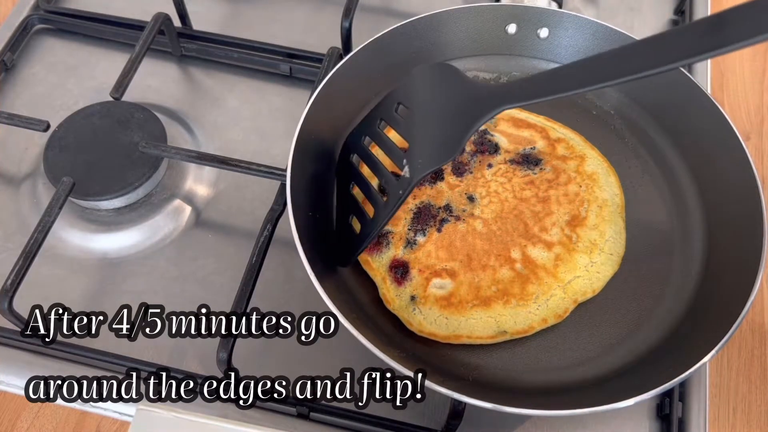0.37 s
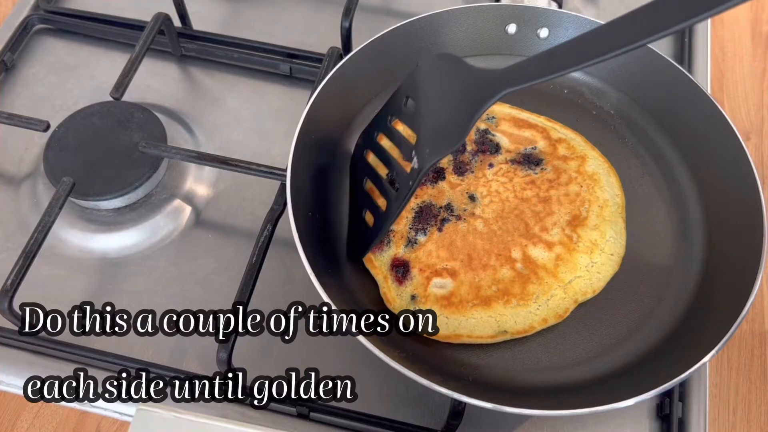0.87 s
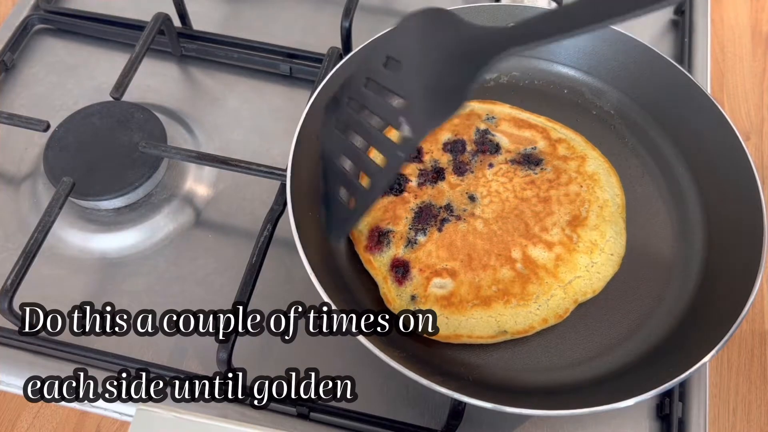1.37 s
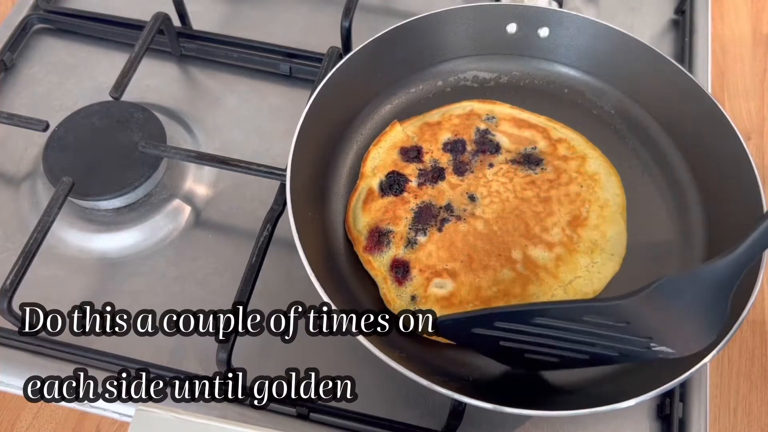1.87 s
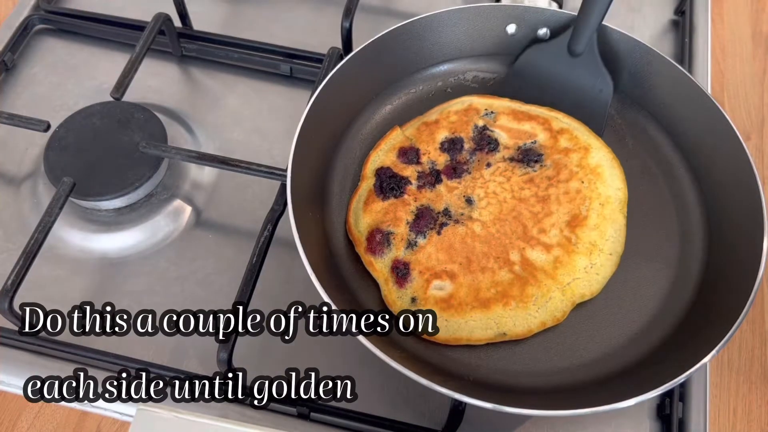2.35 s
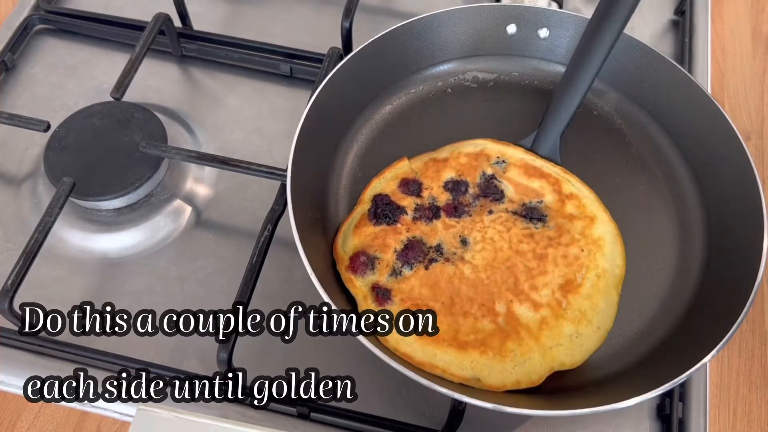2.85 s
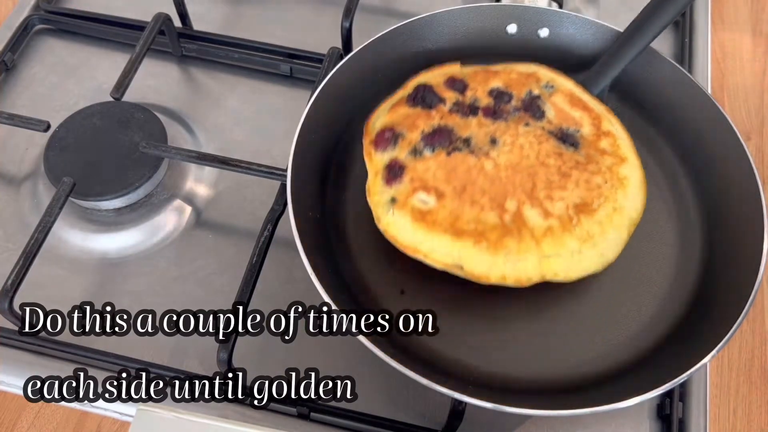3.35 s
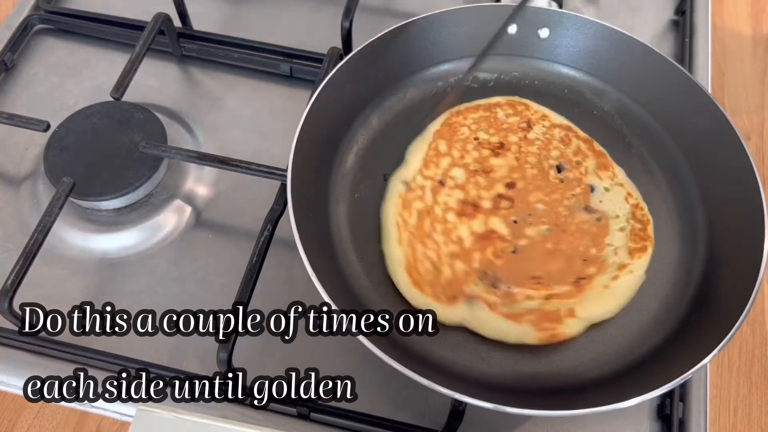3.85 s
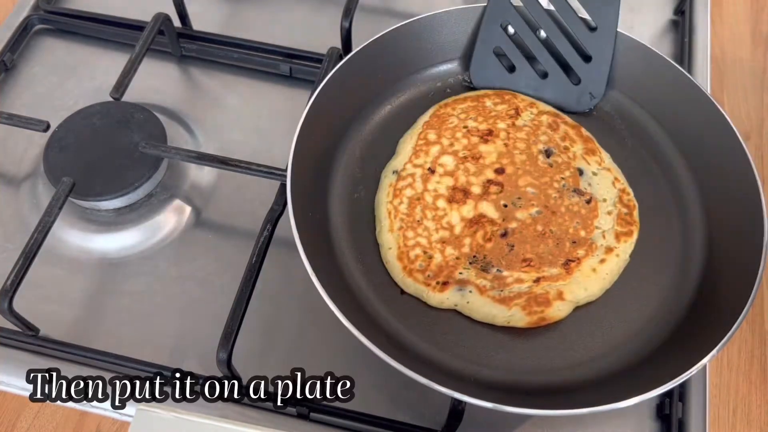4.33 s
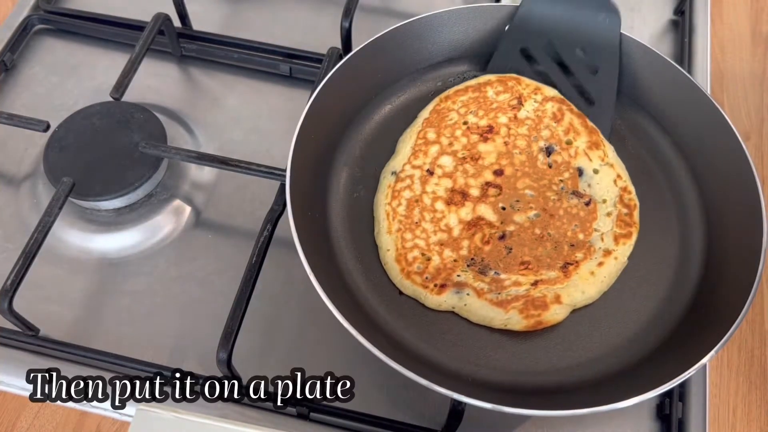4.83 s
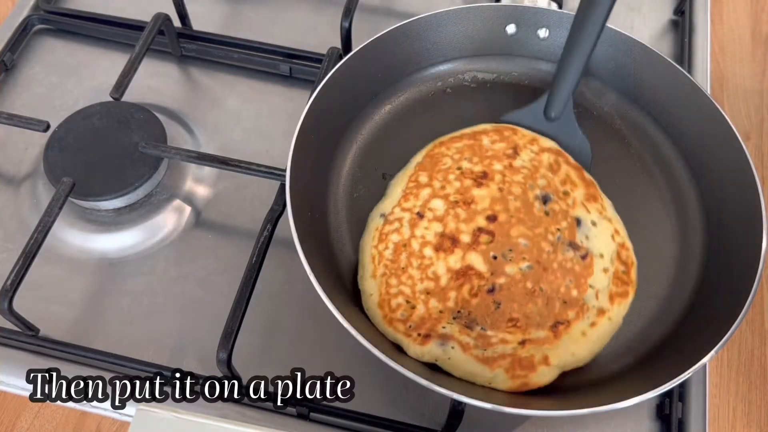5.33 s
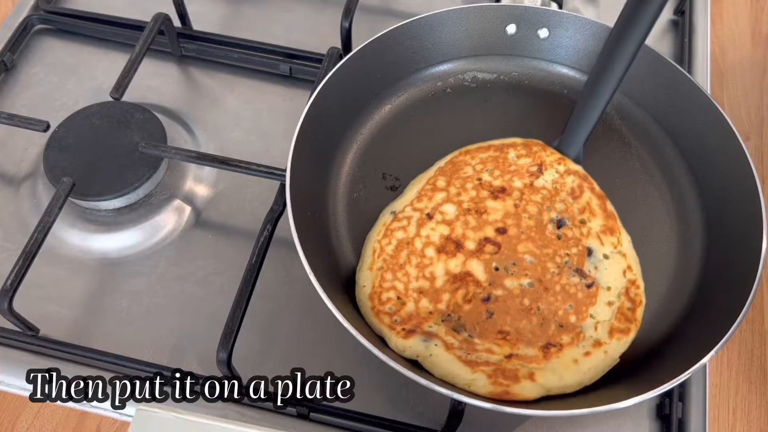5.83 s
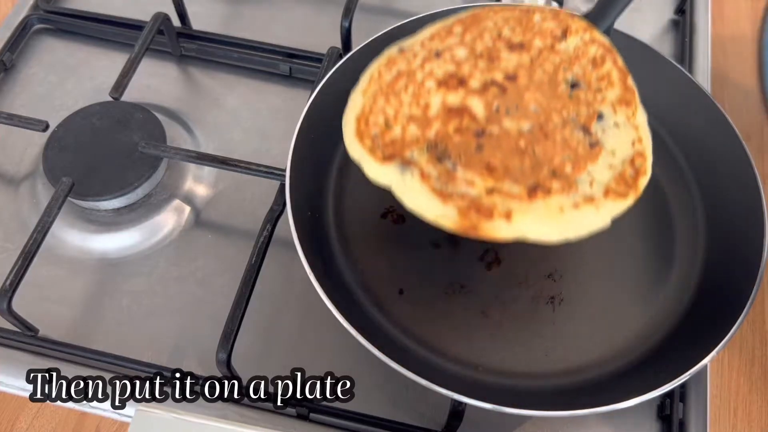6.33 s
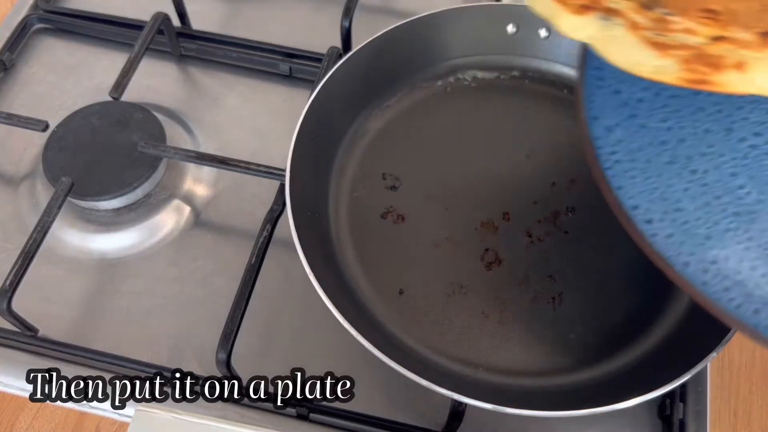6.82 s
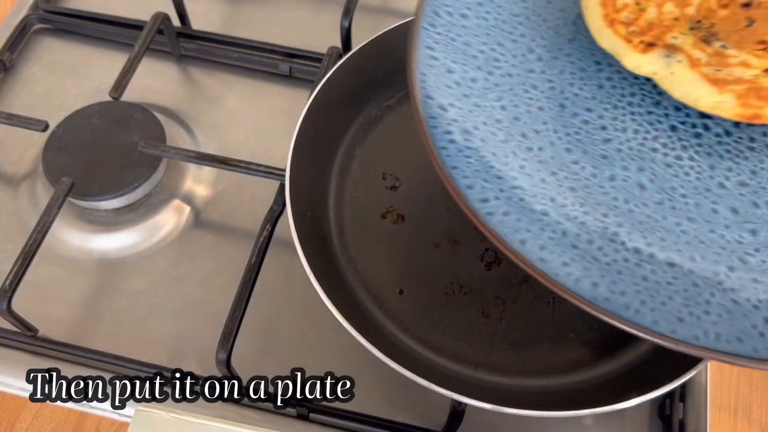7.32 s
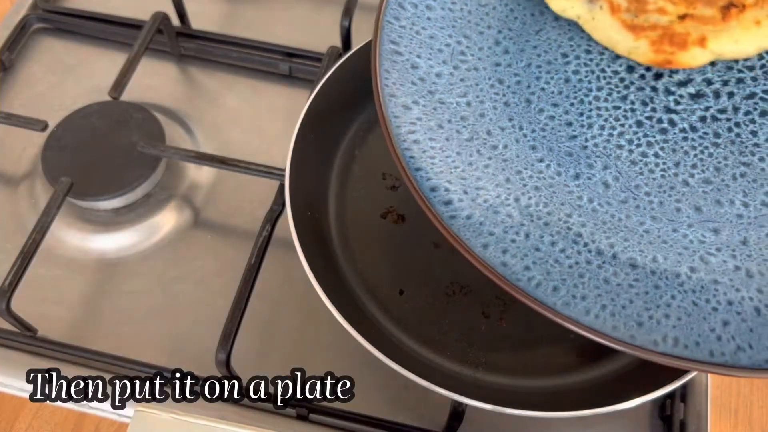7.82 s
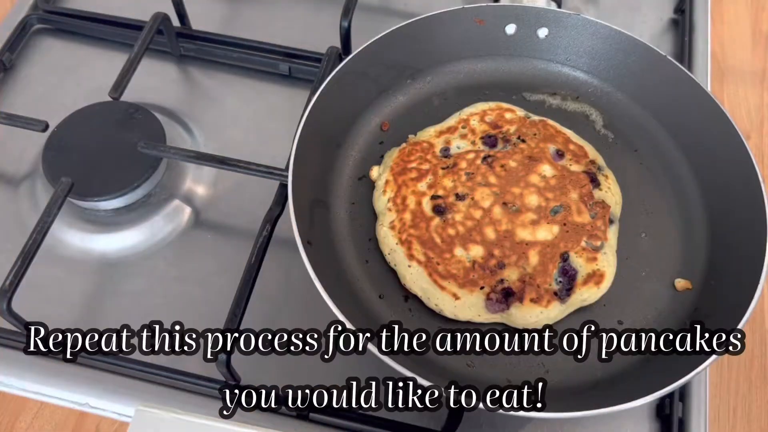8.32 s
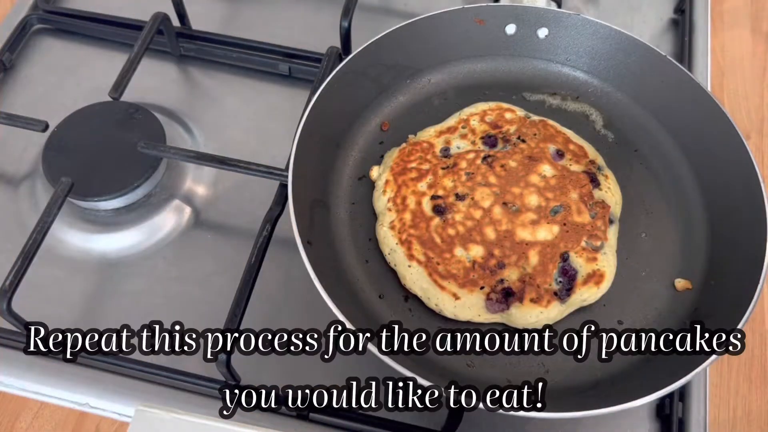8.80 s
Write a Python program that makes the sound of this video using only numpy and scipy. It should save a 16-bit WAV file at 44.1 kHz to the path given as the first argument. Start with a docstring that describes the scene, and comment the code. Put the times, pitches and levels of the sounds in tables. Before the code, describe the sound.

Close to a pan on a gas stove, a plastic spatula knocks and rubs lightly over faint frying while a small motor buzzes twice nearby. Scrapes slide under a pancake; it flips and lands with a loud slap and soft thud. Fat sizzles and spits brightly for a second or two, then dies away. Near silence follows, ending with sparse tiny crackles in a small kitchen.

```python
"""A nonstick pan close to the microphone: a plastic spatula loosens, flips and lifts a pancake on a gas stove.
Knocks and rubs ring the pan's damped modes; fat sizzles, steams and spits as clicks, noise and short rings.
A small vibrating motor spins up twice nearby, a gliding sine that rings the counter under it.
Flame, room tone, low rumble, thin tones and a short kitchen echo lie around them.
There are four stretches; the level dips briefly between them."""
import sys
import numpy as np
from scipy import signal
from scipy.io import wavfile
from scipy.ndimage import uniform_filter1d

SR = 44100
rng = np.random.default_rng(int(sys.argv[2]) if len(sys.argv) > 2 else 0)


def voltage_ratio(decibels):
    """Convert decibels (scalar or array-like) to amplitude ratios, 20 dB per decade."""
    exponent = np.asarray(decibels, float) / 20
    return 10 ** exponent


def dump(signal):
    """Clip the signal to [-1, 1] and save it as 16-bit WAV at the path in sys.argv[1]."""
    limited = np.clip(np.atleast_2d(signal).T, -1, 1)
    pcm = np.round(limited * 32767).astype(np.int16)
    wavfile.write(sys.argv[1], SR, pcm)


N = 404826


def rms_one(x):
    """Scales to rms 1."""
    return x / np.sqrt(np.mean(x ** 2) + 1e-20)


def evened(x):
    """Holds the level near 1 over a fifth of a second."""
    return x / np.sqrt(uniform_filter1d(x ** 2, size=8820) + 1e-20)


def to_db(power):
    """Power to dB."""
    return 10 * np.log10(power + 1e-20)


def band(x, low_hz, high_hz):
    """Keeps what lies between two frequencies."""
    return signal.sosfilt(signal.butter(2, [low_hz, high_hz], "band", fs=SR, output="sos"), x)


def in_time(rows):
    """Columns of a table, one value a sample."""
    s, *columns = np.transpose(rows)
    return [np.interp(np.arange(N) / SR, s, column) for column in columns]


def at_hz(points, hz):
    """Reads a spectrum on a log frequency axis."""
    point_hz, value = np.transpose(points)
    return np.interp(np.log(hz), np.log(point_hz), value)


def drift(rate_hz):
    """Slow chance of spread 1, drawn every 40 samples."""
    r = np.exp(-80 * np.pi * rate_hz / SR)
    noise = rng.standard_normal(N // 40 + 2002)
    slow = signal.lfilter([1], [1, -2 * r, r * r], noise)[2000:]
    return np.interp(np.arange(N) / 40, np.arange(len(slow)), rms_one(slow))


def ring(force, hz, t60):
    """A unit click sets a sine of height 1 ringing, 60 dB down after t60 seconds."""
    r, w = voltage_ratio(-60 / (t60 * SR)), 2 * np.pi * hz / SR
    return signal.lfilter([0, np.sin(w)], [1, -2 * r * np.cos(w), r * r], force + 1e-18)


def glide(rows, rough_db):
    """A sine along a pitch and rms level curve, silent outside it."""
    hz, db = in_time(rows)
    sample = np.arange(N)
    on = (sample > rows[0][0] * SR) & (sample < rows[-1][0] * SR)
    sine = np.sin(2 * np.pi * np.cumsum(hz) / SR)
    return np.sqrt(2) * voltage_ratio(db + rough_db * drift(90)) * on * sine


def grains(per_s, spread_db, hiss):
    """Random clicks of uneven size on a share of smooth noise, for mid and side."""
    sizes = voltage_ratio(spread_db * np.minimum(rng.exponential(1, N), 5)) * rng.choice([-1, 1], N)
    born = rng.random(N) < per_s * voltage_ratio(3 * drift(8)) / SR
    mid = rms_one(sizes * born) + hiss * rng.standard_normal(N)
    return np.array([mid, rng.standard_normal(N)])


# How alike the two microphone channels hear the noises around them.
# Each row: frequency in Hz, left-right likeness from -1 to 1.
EAR_LIKENESS = [(70, .999), (180, 0.79), (550, 0.26), (1650, 0.89), (5000, 0.99)]


def coloured(source, spectrum, patchy_db):
    """Twelve-band bank: each band has its level, flicker and left-right likeness; rms 1."""
    out, together = 0, 0.21 * drift(27.0)
    edges = np.geomspace(spectrum[0][0], spectrum[-1][0], 13)
    source = source / np.std(source, axis=1, keepdims=True)
    for k, (low, high) in enumerate(zip(edges, edges[1:])):
        mid, side = band(source, low, high)
        hz = np.sqrt(low * high)
        alike = np.clip(at_hz(EAR_LIKENESS, hz), -1, 1)
        flicker_db = patchy_db * (together + 0.94 * drift(14))
        gain = voltage_ratio(at_hz(spectrum, hz) + flicker_db) * (-1) ** k
        out = out + gain * (np.sqrt(1 + alike) * mid + np.sqrt(1 - alike) * side * [[1], [-1]])
    return rms_one(out)


# The stretches at the stove. Each row: start in seconds, free ring of the pan under the murmur from 0 to 1,
# small spits over the sizzle in relative dB, low rumble in relative dB, room tone in dB.
STRETCH_ROWS = [(0, 0.6, -21, -63.5, -72.5), (1.986, 0.69, 17.5, -69.5, -70),
                (4.257, 0.41, 14, -68.5, -70.5), (8.018, 0.14, 18.5, -75, -66.5)]


def stretch_at(s):
    """Which stretch a moment lies in."""
    return np.clip(np.searchsorted(np.transpose(STRETCH_ROWS)[0], s) - 1, 0, None)


def by_stretch():
    """Columns of the stretch table, each held until the next stretch starts."""
    return np.transpose(STRETCH_ROWS)[1:, stretch_at(np.arange(N) / SR)]


def favour(hz, centre_hz, octaves):
    """The contact point favours the modes near one pitch."""
    return np.exp(-.5 * (np.log2(hz / centre_hz) / octaves) ** 2)


# The pan, close by, rings differently as its load and seating change: one table of modes a seating.
# Each row: frequency in Hz, struck level in relative dB, t60 in seconds, rubbed level in relative dB.
PAN_MODES = [
    [(553, -2, 0.065, 20), (823, 0, 0.49, 6), (1000, 7.5, 0.014, -38), (1177, -2.5, 0.17, -37),
     (1400, -1, 0.044, 5), (1587, -4, 0.11, 7), (1795, 0, 0.1, -3), (2267, -1.5, 0.13, -2.5),
     (2863, 0.5, 0.12, -21), (3340, -0.5, 0.047, -10)],
    [(438, -13.5, 0.11, 6.5), (743, 4, 0.079, -0.5), (1162, 7, 0.028, -2.5), (1230.4, -3.5, 0.22, 0.5),
     (1899, -6, 0.24, -15), (1954, 0, .25, -2.5), (2074, -12.5, 0.078, -7), (2370, -4.5, 0.13, -8.5),
     (2505, -6.5, 0.14, -5), (2924, 6, 0.055, -12), (3204, 7.5, 0.093, -14.5), (3740, -3.5, .07, -1.5),
     (4306, 0.5, 0.037, -13), (8300, 7.5, 0.072, -32)],
    [(590, 2, 0.043, -16), (816, -1.5, 0.071, 6.5), (1313, 1, 0.11, -1.5), (1672, -9, 0.083, -1),
     (1933, -7, 0.035, -20), (2190, -11, 0.13, -7), (2895, -4.5, 0.067, -4.5), (3240, -5, 0.1, -5)],
]
# Each entry: the seating, as an index into the pan tables, of one stretch.
STRETCH_SEATING = [0, 1, 2, 2]


def rub(level_db, centre_hz, free):
    """The sliding edge stutters into wandering pan modes over a rustle; the grate trembles along."""
    force = grains(per_s=540.0, spread_db=4.0, hiss=1.8)[0]
    seating = np.array(STRETCH_SEATING)[stretch_at(np.arange(N) / SR)]
    tones = 0
    for seat, modes in enumerate(PAN_MODES):
        seat_force = force * (seating == seat)
        for k, (hz, _, t60, rub_db) in enumerate(modes):
            wander = (-1) ** k * voltage_ratio(rub_db + 5.3 * drift(6.54))
            near = favour(hz, centre_hz, octaves=0.76)
            tones = tones + wander * near * ring(seat_force, hz, t60) * np.sqrt(.1 / t60)
    rustle = 0
    for k, hz in enumerate(np.geomspace(480., 4400., num=14)):
        near = favour(hz, centre_hz, octaves=0.44) + 0.055
        rustle = rustle + (-1) ** k * near * ring(force, hz, 12.0 / hz)
    both = np.sqrt(free) * evened(tones) + np.sqrt(1 - free) * evened(rustle)
    tremble = rms_one(band(force, 120., 420.))
    return voltage_ratio(level_db + 1.0 * drift(30.0)) * (both + voltage_ratio(-12.5) * tremble)


# Frying in the pan, before the strokes add to it.
# Each row: time in seconds, sizzle in dB, steam in dB, murmur of the fat in relative dB.
FRYING_LEVELS = [(0, -60.5, -64, -68.5), (1.7, -60, -66, -73.5), (1.97, -60, -75, -85),
                 (2.0, -71, -78, -82), (2.75, -87.5, -76, -81), (3.74, -100, -81, -68.5),
                 (3.78, -49.5, -48, -35), (3.95, -48, -43, -50.5), (4.23, -46, -46.5, -55.5),
                 (4.28, -63.5, -60, -57), (4.55, -56, -52.5, -53), (4.85, -46.5, -54.5, -47),
                 (5.15, -40, -44.5, -54.5), (5.28, -46, -47.5, -53.5), (5.35, -58, -70, -53.5),
                 (5.5, -50, -66, -57), (5.64, -54, -58.5, -61), (5.76, -65.5, -68, -68),
                 (6.2, -71, -75.5, -74), (7.12, -75.5, -86, -86), (7.99, -88, -83.5, -77),
                 (8.04, -70, -67.5, -72), (8.5, -67, -66.5, -68.5), (9.18, -67.5, -68, -71.5)]


def frying():
    """Sizzle, steam and murmur levels in dB, gliding from row to row."""
    return in_time(FRYING_LEVELS)


# Colour of the steam over the pan. Each row: frequency in Hz, density in relative dB per Hz.
STEAM_COLOUR = [(1200, -31), (2200, -7), (4000, -8), (7000, -12.5), (9500, -14.5), (15500, -26)]


def steam(level_db):
    """Steam and the hiss of the strokes: dense clicks on noise, its bands flickering."""
    return voltage_ratio(level_db) * coloured(grains(per_s=1500.0, spread_db=4.5, hiss=1.9), STEAM_COLOUR, patchy_db=2.5)


# Colour of the fat frying close by. Each row: frequency in Hz, density in relative dB per Hz.
SIZZLE_COLOUR = [(3530, -36), (6000, -10.5), (9180, -17), (10000, -10), (11900, -1), (16200, -10.5)]


def sizzle(level_db):
    """Frying fat: dense clicks over a little noise, high in pitch."""
    source = grains(per_s=2000.0, spread_db=2.0, hiss=0.4)
    return voltage_ratio(level_db) * coloured(source, SIZZLE_COLOUR, patchy_db=0.0)


# Flame and room tone, all around. Each row: frequency in Hz, density in relative dB per Hz.
ROOM_COLOUR = [(59, -26.5), (100, 0), (275, -15), (908, -7), (1700, -11), (1850, -32), (1960, -33.5),
               (3000, -16), (3900, -54), (6600, -120)]


def room_tone(level_db):
    """Flame and room as noise whose bands flicker."""
    return voltage_ratio(level_db) * coloured(rng.standard_normal((2, N)), ROOM_COLOUR, patchy_db=5.0)


def rumble(level_db):
    """Low room noise gathered around one room mode, alike at both ears."""
    noise = rng.standard_normal(N)
    broad = band(noise, 25., 130.)
    return voltage_ratio(level_db + 1.4 * drift(5)) * (rms_one(ring(noise, 74.0, 0.17)) + 0.97 * rms_one(broad))


# Thin steady tones behind the rest. Each row: frequency in Hz, level in dB.
THIN_TONES = [(1970, -85), (3300, -95)]


def whine():
    """Thin sines at steady pitch, their level slightly rough."""
    return sum(glide([(0, hz, db), (N / SR, hz, db)], rough_db=0.88) for hz, db in THIN_TONES)


# Larger drops of fat spitting close by.
# Each row: time in seconds, click height in dB, body below 6 kHz in dB relative to that click.
LARGE_POPS = [(0.9632, -30.5, -14), (2.635, -38, -5), (3.665, -42.5, 11), (4.087, -17.5, -20),
              (4.4976, -23, -6), (4.5679, -24.5, -17), (4.5954, -24, -2.5), (4.8391, -18, -4),
              (4.8895, -18, -12), (4.95, -22.5, -2), (5.2123, -18.5, -12), (5.909, -33, -19),
              (6.1663, -36, -18), (6.2264, -42.5, -3.5), (6.263, -41.5, -4), (6.619, -43.5, -6),
              (6.7015, -40.5, 1.5), (6.708, -46.5, 2.5), (7.3707, -48, -5), (8.135, -51, 11.5),
              (8.322, -40, -18), (8.651, -37, -4), (8.697, -40, 3), (8.751, -44.5, 6), (8.938, -40.5, 1.5),
              (9.082, -38.5, 0)]


def pops(sizzle_db, spit_db):
    """Bursting droplets: close ticks, bright or with body below; small ones clump, at pitches drawn by chance."""
    size_db = spit_db + 3 * np.minimum(rng.exponential(1, N), 3)
    born = rng.random(N) < 160 * voltage_ratio(6 * drift(8)) / SR
    tick = voltage_ratio(sizzle_db + size_db) * born * rng.choice([-1, 1], N)
    body = tick * rng.uniform(0, 0.84, N) ** 2
    tick = tick * rng.random(N)
    dealt = rng.integers(0, 7, N)   # which of seven pitches a droplet takes
    tick_hz = np.geomspace(9000., 14000., num=7)
    small = sum(ring(tick * (dealt == k), hz, 6.6 / hz) for k, hz in enumerate(tick_hz))

    s, peak_db, body_db = np.transpose(LARGE_POPS)
    at = (s * SR).astype(int)
    sign = rng.choice([-1, 1], len(LARGE_POPS))
    big = np.zeros(N)
    big[at] = sign * voltage_ratio(peak_db)
    body[at] = sign * voltage_ratio(peak_db + body_db)
    dealt[at] = 4   # the large ones all take the same pitch
    # further ticks follow within a few milliseconds
    big = big + sum(np.roll(big * rng.normal(0, 0.3, N), lag) for lag in (37, 89, 151))
    bright = 0.83 * ring(big, 12000., 0.0021) - 0.4 * ring(big, 7000.0, 0.0019)
    body_hz = np.geomspace(1100., 6000., num=7)
    sung = sum(ring(body * (dealt == k), hz, 7.3 / hz) for k, hz in enumerate(body_hz))
    burst = bright + 1.32 * small + .8 * ring(body, 4700.0, 0.00074) + 0.39 * sung
    return burst * voltage_ratio(0.68 * drift(40) * [[1], [-1]])


# The motor nearby. Each entry: start in seconds.
MOTOR_START_S = [0.0388, 0.528]
# The surface under the motor. Each row: frequency in Hz, level in relative dB, t60 in seconds.
COUNTER_MODES = [(112.5, -2, 0.9), (129.5, 10.5, 0.33), (159.2, 2.5, 0.81), (189.5, 1.5, 0.73)]
DRIVEN_S, SPIN_UP_S = 0.21, 0.076
SLOW_HZ, FAST_HZ, COAST_HZ_PER_S = 61, 199.3, 766
FULL_S, STOP_S = 0.042, 0.31   # after each start: full level reached, fall begun
RISE_DB_PER_S, FALL_DB_PER_S = 598, 698


def motor():
    """An off-centre weight shakes once a turn; counter modes beat with it and ring on under a faint buzz."""
    t = np.linspace(0, .38, num=60)
    driven = np.minimum(t, DRIVEN_S)
    hz = FAST_HZ - (FAST_HZ - SLOW_HZ) * np.exp(-driven / SPIN_UP_S)
    hz = hz - COAST_HZ_PER_S * (t - driven)
    slope_db = np.minimum(RISE_DB_PER_S * (t - FULL_S), FALL_DB_PER_S * (STOP_S - t))
    db = -31.5 + np.minimum(0, slope_db)   # midway between the two ears
    shake = sum(glide(np.transpose([s + t, hz, db]), rough_db=0) for s in MOTOR_START_S)
    buzz = band(shake * rng.standard_normal(N), 270., 450.)   # noise shaken loose
    counter = sum(voltage_ratio(mode_db - 71) * ring(shake, mode_hz, t60) for mode_hz, mode_db, t60 in COUNTER_MODES)
    # slightly louder at the second ear than at the first
    return (shake + voltage_ratio(-12.5) * buzz + counter) * voltage_ratio([[-.4], [.4]])


# Spatula and pancake on the pan, close by. Each row: time in seconds, peak of the ringing in dB,
# favoured pitch in Hz, spread in octaves, free ring in seconds until damped.
PAN_KNOCKS = [(0.103, -38.5, 840, 0.8, 0.12), (0.12, -35.5, 1340, 0.22, 0.0038),
              (.30, -47, 854, 0.28, 0.0052), (0.442, -31.5, 1000, 0.6, 0.0032),
              (.679, -42.5, 905, 0.47, 0.01), (.690, -33, 1060, 0.78, 0.0063),
              (.747, -38.5, 900, 0.22, 0.0081), (0.786, -42.5, 1190, 0.5, 0.0051),
              (1.699, -33.5, 1120, 1, 0.071), (1.784, -40.5, 607, 0.43, 0.013),
              (1.805, -43.5, 784, 0.54, 0.029), (1.952, -44.5, 577, 0.36, 0.032),
              (2.024, -38.5, 1860, 0.19, 0.048), (2.089, -42, 1510, 0.27, 0.039),
              (3.7609, -11, 2024, 0.16, 0.034), (3.777, -16.5, 1170, 0.11, 0.032),
              (3.798, -17, 2170, 0.26, 0.004), (3.849, -20, 2300, 0.18, 0.0027),
              (3.899, -19.5, 2115, 0.29, 0.003), (4.128, -33.5, 1930, 0.1, 0.0036),
              (4.324, -33, 1360, 0.59, 0.0025), (4.333, -32.5, 665, 0.44, 0.018),
              (4.468, -22.5, 900, 0.62, 0.014), (8.528, -40.5, 1950, 0.86, 0.002),
              (8.915, -41, 2000, 0.69, 0.0027)]
# The spatula meets the rim. Each row: the same columns as the knocks.
RIM_TAPS = [(3.715, -23.5, 1730, 1.5, 0.053)]
# The free spatula. Each row: frequency in Hz, level in relative dB, t60 in seconds.
BLADE_MODES = [(717, -6.5, 0.12), (1099, 1, 0.08), (1870, -1.5, 0.088), (2680, -4.5, .06)]


def knocks():
    """Each blow rings the modes until contact damps them, with a short dull crack."""
    out, t = np.zeros(N + SR), np.arange(SR // 4) / SR
    onset = np.clip(t / 0.00042, 0, 1)   # plastic contact is soft
    blows = [(row, PAN_MODES[STRETCH_SEATING[stretch_at(row[0])]]) for row in PAN_KNOCKS]
    blows += [(row, BLADE_MODES) for row in RIM_TAPS]
    chance = rng.normal(0, 1, (len(blows), 2, max(map(len, PAN_MODES)), 1))
    for ((s, peak_db, centre_hz, octaves, free_s), body), draws in zip(blows, chance):
        hz, db, t60 = np.transpose(body)[:3, :, None]
        own, phase = draws[:, :len(body)]
        strength = voltage_ratio(db + 2.5 * own) * (favour(hz, centre_hz, max(octaves, .03)) + 0.075)
        sines = np.sin(2 * np.pi * hz * t + 1.3 * phase)
        modes = np.sum(strength * sines * voltage_ratio(-60 * t / t60), axis=0) * onset
        modes *= voltage_ratio(-2200 * np.clip(t - free_s, 0, .013))   # contact damps
        # the crack has a ragged tail
        decay = voltage_ratio(-60 * t / min(0.035, 1.7 * free_s)) + 0.24 * voltage_ratio(-60 * t / 0.2)
        crack = rng.standard_normal(len(t)) * onset * decay
        # harder blows crack brighter
        top_hz = min(2.3 * centre_hz + 80000. * voltage_ratio(2 * peak_db), .4 * SR)
        crack = band(crack, .5 * centre_hz, top_hz)
        at = round(s * SR)
        out[at:at + len(t)] += voltage_ratio(peak_db) * (modes / np.max(np.abs(modes)) + 0.57 * crack)
    return out[:N]


# Strokes of the spatula over the pan. Each row: start in seconds, length in seconds, rub in relative dB,
# favoured pitch in Hz, hiss in dB, share of free ring from 0 to 1.
SPATULA_STROKES = [(0.112, 0.22, -65.5, 1000, -103, 0.7), (0.447, 0.031, -60, 1080, -73, 0.4),
                   (0.666, 0.2, -62.5, 1070, -69, 0.4), (1.716, 0.21, -62, 770, -66.5, 0.64),
                   (2.018, 0.11, -46, 1600, -59.5, 0.73), (2.16, 0.1, -52.5, 2100, -53, 0.46),
                   (2.284, 0.16, -50.5, 2150, -52.5, 0.15), (2.473, 0.34, -58, 1400, -63.5, 0.7),
                   (2.785, 0.059, -54.5, 1550, -63, 0.82), (3.091, 0.11, -55.5, 1620, -71, 0.87),
                   (3.202, 0.03, -64, 1540, -60.5, 0.6), (3.668, 0.13, -58.5, 1600, -58.5, 0.64),
                   (4.454, 0.15, -51.5, 806, -66.5, .5), (4.636, 0.07, -49, 820, -64, 1),
                   (4.69, 0.025, -51, 1320, -49, 1), (4.8, 0.23, -54, 1600, -48.5, 0.5),
                   (5.094, 0.23, -59, 1870, -51, 0), (5.317, 0.29, -79, 1400, -53.5, 0),
                   (7.15, 0.056, -68.5, 3000, -84, 0.5), (7.941, 0.021, -72, 3110, -90, 0.2)]


def strokes():
    """Each stroke rises, holds and falls: rub power, power-weighted log pitch and free ring, hiss power."""
    t, out = np.arange(N) / SR, np.zeros((4, N))
    for s, length, rub_db, hz, hiss_db, free in SPATULA_STROKES:
        rise_db, fall_db = 451.5 * (t - s), 266.5 * (s + length - t)   # slopes in dB per second
        shape_db = np.minimum(0, np.minimum(rise_db, fall_db))
        near = shape_db > -60
        power = voltage_ratio(2 * (rub_db + shape_db[near]))
        hiss_power = voltage_ratio(2 * (hiss_db + shape_db[near]))
        out[:, near] += [power, power * np.log(hz), power * free, hiss_power]
    return out


# The edge slips on the pan. Each row: time in seconds, pitch in Hz, level in dB.
EDGE_SLIPS = [(3.19, 7600, -85), (3.225, 7570, -62), (3.29, 7640, -77)]


def squeak():
    """A slipping edge sings one high, rough sine."""
    return glide(EDGE_SLIPS, rough_db=5.2)


# Pancake and pan landing on the grate.
# Each row: time in seconds, push in relative dB, lowest mode in relative dB.
LANDINGS = [(3.768, -26.5, -12), (3.813, -28, 0), (4.471, -35, -2)]
# The grate under the pan. Each row: frequency in Hz, level in relative dB, t60 in seconds.
GRATE_MODES = [(76, -6, 0.62), (111, -4, 0.098), (139, -1, 0.036), (165, -4, 0.23), (282.3, -1.5, 0.017)]


def thuds():
    """Soft landings shake the grate; its lowest mode booms most when the whole pan drops."""
    out = np.zeros(N)
    s, db, boom_db = np.transpose(LANDINGS)
    for k, (hz, mode_db, t60) in enumerate(GRATE_MODES):
        push = np.zeros(N)
        push[(s * SR).astype(int)] = voltage_ratio(db + mode_db + boom_db * (k == 0)) * (-1) ** k
        out += ring(push, hz, t60)
    return band(out, 45., 350.)


def kitchen(x):
    """Walls as feedback delays, five a side, duller on every round."""
    t60, wall_cut_hz = 0.11, 1500
    out, dull = np.zeros((2, N)), np.exp(-2 * np.pi * wall_cut_hz / SR)
    for k, lag in enumerate((rng.uniform(.012, .035, 10) * SR).astype(int)):
        loop, gain, state = x.copy(), voltage_ratio(-60 * lag / SR / t60), [0.]
        for i in range(lag, N, lag):
            back, state = signal.lfilter([gain * (1 - dull)], [1, -dull], loop[i - lag:i], zi=state)
            loop[i:i + lag] += back[:N - i]
        out[k % 2] += (loop - x) * (-1) ** (k // 2)
    return out


def scene():
    """Pan sounds close by, with the kitchen around them."""
    sizzle_db, steam_db, murmur_db = frying()
    free, spit_db, rumble_db, room_db = by_stretch()
    rub_power, rub_pitch, rub_free, hiss_power = strokes()
    # the murmur of the fat plays through the same pan modes as the strokes, around 1600 Hz
    murmur = voltage_ratio(2 * murmur_db)
    rub_db = to_db(rub_power + murmur)
    centre_hz = np.exp((rub_pitch + murmur * np.log(1600.)) / (rub_power + murmur + 1e-20))
    free = (rub_free + murmur * free) / (rub_power + murmur + 1e-20)
    # the hiss of the strokes joins the steam, and 16 dB weaker the sizzle
    steam_db = to_db(voltage_ratio(2 * steam_db) + hiss_power)
    treble_db = to_db(voltage_ratio(2 * sizzle_db) + voltage_ratio(2 * -16) * hiss_power)
    # the stove top sounds along with the rub
    room_db = to_db(voltage_ratio(2 * room_db) + voltage_ratio(2 * (rub_db - 5.5)))
    pan = rub(rub_db, centre_hz, np.clip(free, 0, 1)) + knocks() + squeak()
    close = pan + pops(treble_db, spit_db) + thuds() + steam(steam_db) + sizzle(treble_db)
    around = voltage_ratio(-6.5) * kitchen(pan) + room_tone(room_db) + rumble(rumble_db) + whine()
    return close + around + motor()


def roll_off(x):
    """The treble ends steeply here."""
    return signal.sosfilt(signal.butter(12, 16720, fs=SR, output="sos"), x)


def record(dry):
    """The level dips to 0.03 and back at each join, 30 ms either way."""
    t = np.arange(N) / SR
    fade = np.prod([np.clip(np.abs(t - s) / .03, .03, 1) for s, *_ in STRETCH_ROWS[1:]], axis=0)
    return roll_off(dry * fade)


dry = scene()
out = record(dry)
dump(out)
```